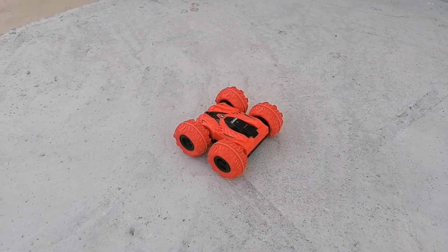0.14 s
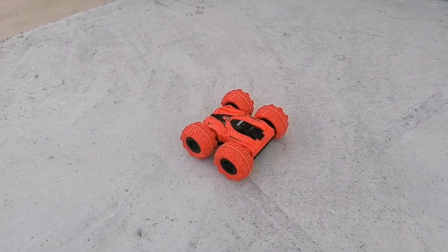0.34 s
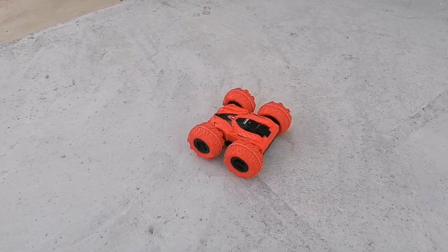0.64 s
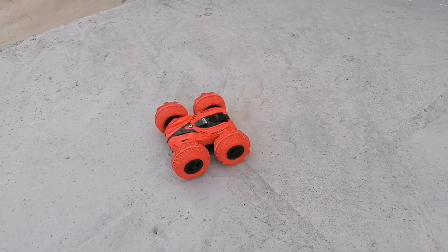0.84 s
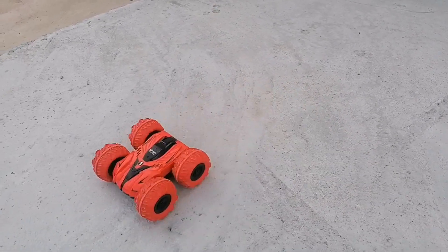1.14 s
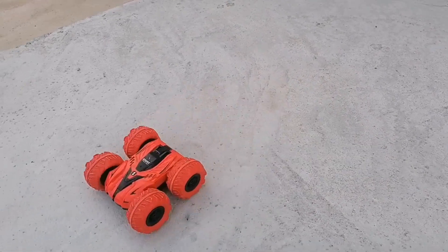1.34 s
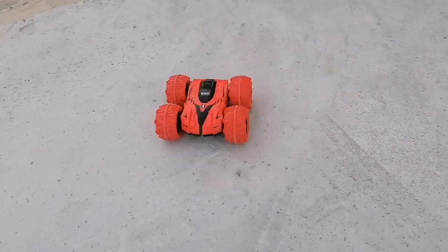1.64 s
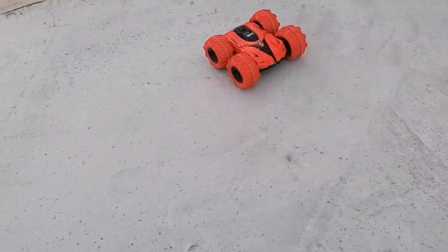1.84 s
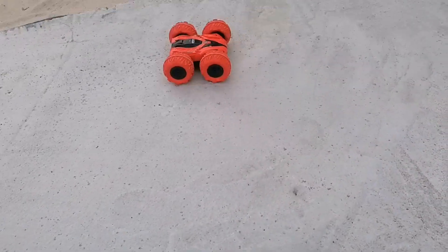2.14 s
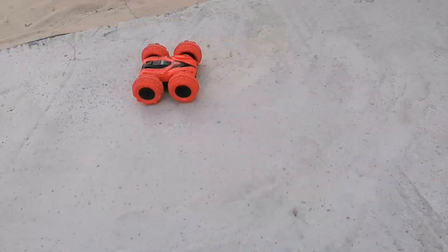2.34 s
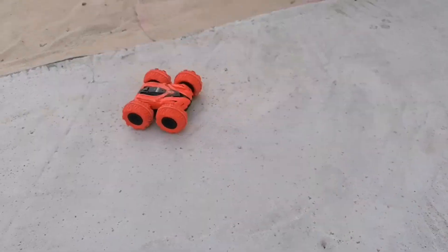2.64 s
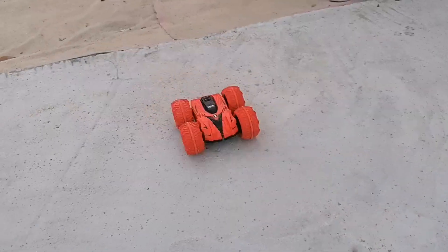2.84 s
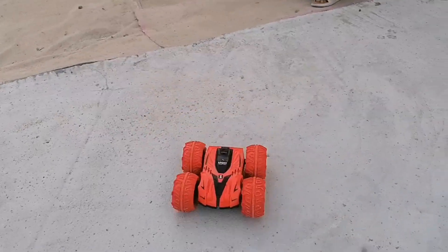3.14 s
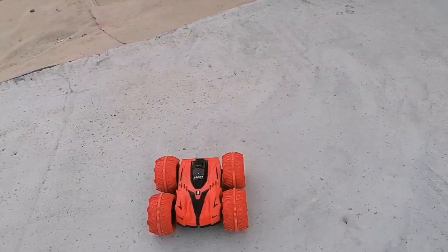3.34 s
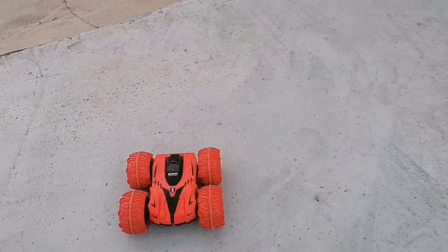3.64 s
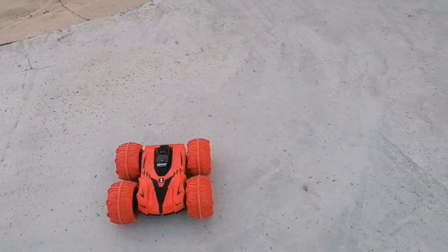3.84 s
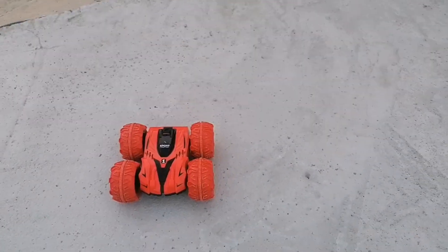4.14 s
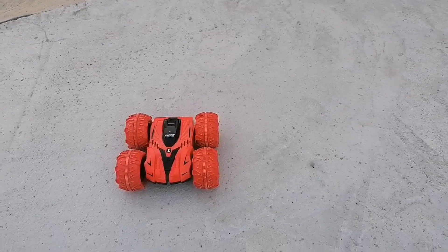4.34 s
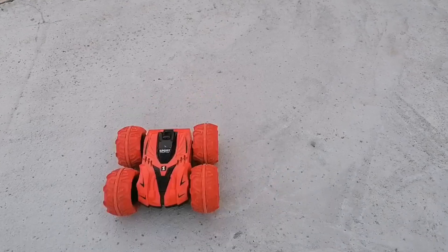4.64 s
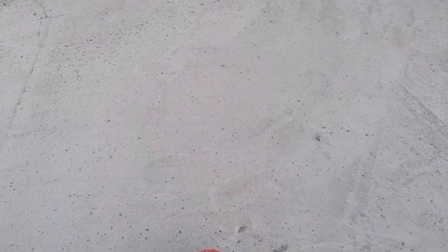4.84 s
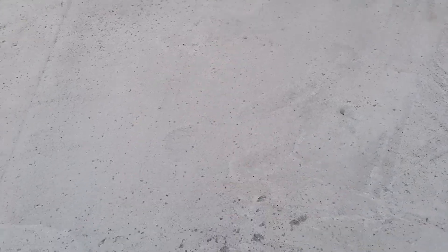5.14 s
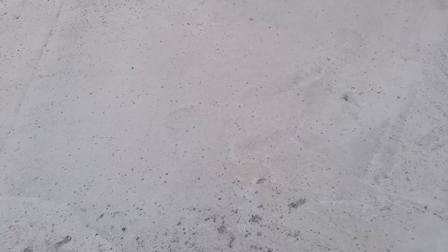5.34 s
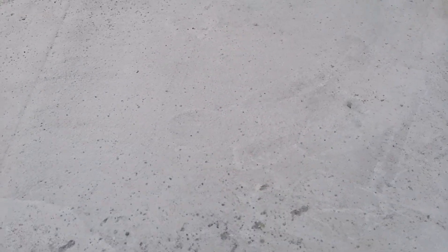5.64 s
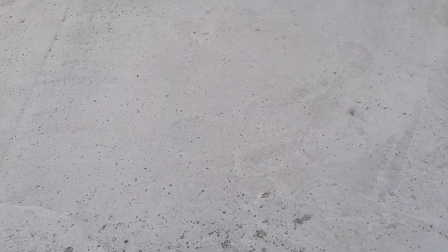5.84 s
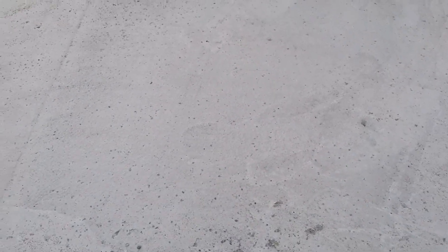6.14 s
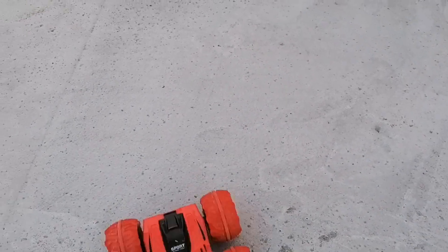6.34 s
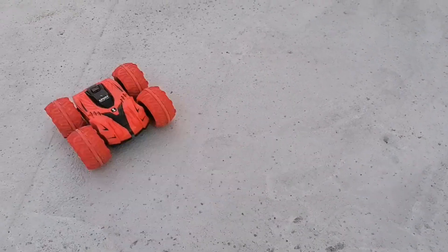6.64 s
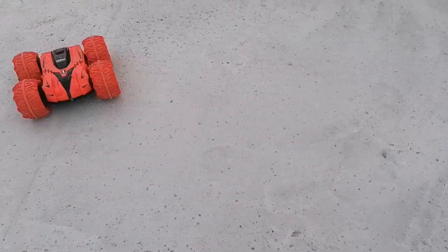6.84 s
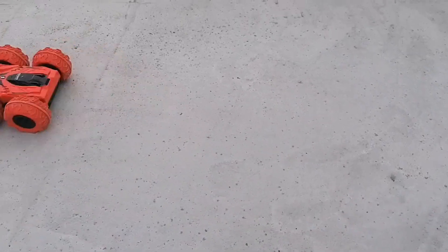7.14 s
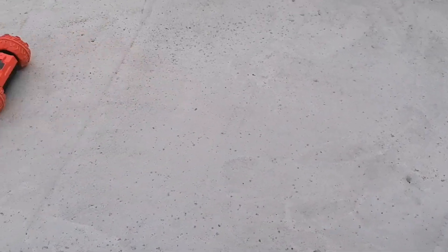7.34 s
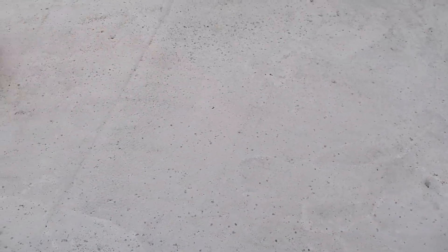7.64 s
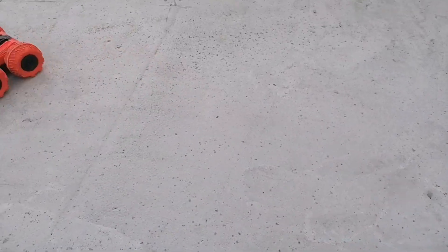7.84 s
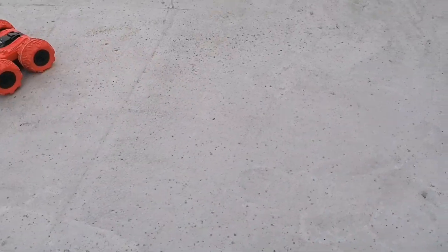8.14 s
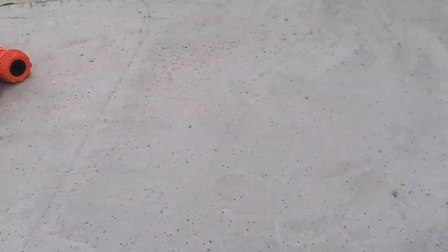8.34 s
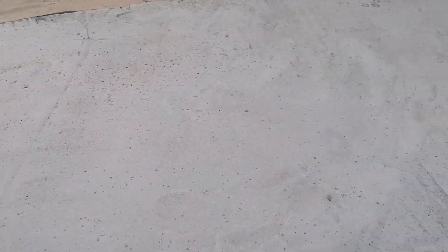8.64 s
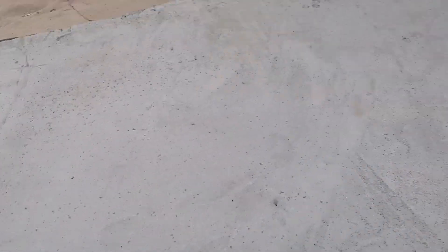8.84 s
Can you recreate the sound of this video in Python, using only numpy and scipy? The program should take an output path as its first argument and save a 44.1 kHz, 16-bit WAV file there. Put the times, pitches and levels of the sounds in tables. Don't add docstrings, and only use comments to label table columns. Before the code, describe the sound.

Close, buzzy plastic gear whirring starts, stops and races as a little remote-control car scuttles across concrete, knobbly wheels drumming and grit ticking.

```python
import sys
import numpy as np
from scipy import signal
from scipy.fft import rfft, irfft
from scipy.io import wavfile
from scipy.ndimage import uniform_filter1d, map_coordinates

SR = 44100
rng = np.random.default_rng(int(sys.argv[2]) if len(sys.argv) > 2 else 0)


def invert_db(level):
    return 10 ** (np.asarray(level, dtype=float) / 20)


def to_wav(sig):
    pcm = np.clip(np.atleast_2d(sig), -1, 1) * 32767
    pcm = np.round(pcm).astype(np.int16)
    wavfile.write(sys.argv[1], SR, pcm.T)


N = 9 * SR


def car():
    # frequency in Hz, level in dB.
    shell_tone = [(450, -68), (700, 5.5), (880, 11.5), (1100, 13.5), (1300, 13), (1500, -9), (1750, -1.5),
                  (2300, -94)]
    # frequency in Hz, level in dB.
    case_tone = [(1100, -75), (1450, 9), (1750, 10.5), (2100, 9.5), (2700, 7.5), (3300, -21), (3900, -8.5),
                 (5000, -64)]
    # frequency in Hz, level in dB per Hz.
    scrape_tone = [(1760, -21), (3000, 0), (4200, -2), (4800, -2), (5250, -4.5), (5800, -6), (7600, -9),
                   (8400, -10.5), (10500, -19), (12300, -33), (15000, -41)]
    # ring in Hz, width in Hz, level in dB.
    can = [(7370, 1170, 0)]
    # time in seconds, gear case turned to us in dB,
    # roughness of the ground in dB, underside turned to us in dB.
    turn_rows = [(0, 18, -10, 6), (.45, -2, 2, 5), (.75, 5, 2.5, 9.5), (1.02, 4.5, -11, 3), (1.4, 1, 5, 11),
                 (1.65, 5, -15, 3.5), (2.4, 4, -11, -17), (2.8, 3, -6, 11.5), (3.2, -3, -3, -0.5),
                 (3.55, -1, 3, 17), (3.95, -3.5, -7.5, -1.5), (4.3, -1, -0.5, 2), (5.8, -0.5, 2.5, 0.5),
                 (6.5, 1.5, -1, 4.5), (7.1, -2.5, -8, -3), (7.75, -5, 1, -2.5), (8.1, -0.5, -1, 1),
                 (8.25, -2.5, 4.5, -2), (8.52, 3.5, -9.5, 2), (8.64, 3, -12, -0.5), (8.8, 7, -17, -1),
                 (8.92, 3, -9, -6), (9, -1, -16, -3)]

    hz, effort_db, skid_db, *manner = throttle()
    case_db, ground_db, under_db = curves(turn_rows)
    whine, rattle = gears(hz, *manner)

    fizz_db = 3.5 + 0.12 * skid_db + under_db
    grit = .5 * clicks(9000, spread_db=3.0)
    scrape = coloured(invert_db(3.5) * whine + rattle + grit, scrape_tone)
    scrape = lifted(scrape, 11200, fizz_db)
    can_db = -18.5 - 0.56 * under_db
    scrape = scrape + invert_db(can_db) * steady(ring(scrape, can))

    drive = whine + rattle
    bright_db = 8.5 * np.log2(hz / 1000) + 0.71 * under_db
    case = steady(lifted(coloured(drive, case_tone), 2000, bright_db))

    wobble_db = 1.43 * chance(hz=21.2, channels=1)
    rock_db = 1.19 * chance(hz=6.9)
    strain_db = 0.32 * (skid_db - 5.5)
    body = invert_db(rock_db[0]) * coloured(drive, shell_tone)
    body = body + invert_db(case_db + strain_db + 0.3 * rock_db[1]) * case
    body = body + invert_db(skid_db) * scrape
    drum_db = ground_db + 1.31 * (effort_db + 21.5) - 22
    return invert_db(effort_db + wobble_db + 1.49) * body + tread(drum_db)


def throttle():
    # time in seconds, tooth meshing in Hz, effort in dB, skid in dB.
    NUDGE = [(.215, 888, -44.5, 1), (.262, 895, -32.5, 3), (.272, 922, -21.5, -10), (.3, 936, -23, -4),
             (.37, 920, -24, -4), (.43, 1158, -20, -5.5), (.52, 1220, -27.5, 3.5), (.62, 1200, -26.5, 0),
             (.7, 1247, -28, 0.5), (.75, 954, -28.5, -12)]
    CREEP = [(.76, 903, -30, -3), (.8, 1057, -32.5, -5), (.93, 863, -28.5, -10), (.98, 1084, -28.5, -3.5),
             (1.07, 1183, -29, -6.5), (1.1, 1057, -31, -1.5), (1.16, 1133, -29, -5), (1.24, 975, -33, -4.5),
             (1.37, 980, -35.5, -10)]
    TWITCH = [(1.38, 963, -32, -8), (1.48, 898, -27, -8), (1.51, 864, -34, -16.5)]
    DASH = [(1.53, 590, -32, -6), (1.56, 620, -23, -10.5), (1.65, 855, -21.5, -5.5), (1.7, 920, -20, -7.5),
            (1.725, 1040, -22, -4.5), (1.78, 1010, -23.5, -3), (1.85, 885, -23, -1), (1.97, 860, -23, -6)]
    EASE = [(2.0, 800, -24.5, -3.5), (2.1, 755, -27, -2), (2.13, 675, -24, -2.5), (2.2, 640, -25, -6),
            (2.25, 565, -25, -9), (2.3, 800, -28.5, -5.5), (2.38, 910, -31, -12), (2.495, 880, -38.5, 0.5)]
    RETURN = [(2.585, 600, -31.5, -12), (2.69, 1054, -25, -0.5), (2.85, 1236, -23.5, -2.5),
              (3.03, 1213, -21, 0), (3.11, 1320, -22, 0.5), (3.24, 1302, -18, -1), (3.3, 1098, -23, -6.5),
              (3.44, 1053, -17, -5.5), (3.6, 848, -25, -11.5)]
    CATCH = [(3.845, 755, -32, -42), (3.92, 797, -23.5, -13.5), (3.97, 832.5, -20.5, 2.5),
             (4.03, 882, -23, -8.5), (4.06, 906, -17, -6), (4.11, 888, -23.5, 2)]
    LONG_RUN = [(4.12, 869, -20, -1.5), (4.28, 935, -19, -5.5), (4.335, 1082, -17.5, -4.5),
                (4.4, 972, -20, -1.5), (4.47, 1063, -20.5, -2), (4.6, 909, -18, -4),
                (4.705, 1090, -19.5, -0.5), (4.76, 953, -21.5, -4), (4.83, 1069, -20, 2)]
    RUN_ON = [(4.84, 1047, -17.5, -4.5), (4.99, 1100, -20, -1.5), (5.08, 956, -19.5, -3),
              (5.19, 897, -16.5, -5), (5.3, 965, -19, -1.5), (5.44, 1065, -21, -2),
              (5.55, 941, -19.5, -0.5), (5.71, 1098, -17, -5), (5.855, 940, -19.5, -6.5)]
    COAST = [(5.89, 932, -29.5, -10), (5.97, 876, -30.5, -15.5), (6, 862, -35, -14),
             (6.27, 556, -42, -21.5)]
    SCUFF = [(6.3, 543, -46.5, 5.1), (6.35, 482, -55, 22.6), (6.4, 398, -47.5, 18)]
    LURCH = [(6.44, 422, -37, -7), (6.495, 632.5, -25, -8.5), (6.515, 940, -24, -1.5),
             (6.545, 644, -21.5, -9.5), (6.57, 960, -20.5, -0.5), (6.6, 1116, -17, -2),
             (6.625, 847, -24, -1.5), (6.73, 869, -28, -11.5)]
    WRIGGLE = [(6.75, 757, -21, -8), (6.79, 905, -18.5, -5.5), (6.82, 771.6, -24.5, -4),
               (6.86, 978, -14, -6.5), (6.868, 1247, -20.5, -9), (6.895, 1190, -17, -1),
               (6.91, 874, -15.5, -10), (6.94, 1046, -22, 3)]
    SPIN = [(6.955, 1160, -18, -0.5), (7.02, 1172, -20, -2.5), (7.06, 1187, -16, -2.5),
            (7.115, 1220, -19.5, -2), (7.16, 1263, -19, -1), (7.22, 1312, -19, -2.5), (7.3, 1367, -22, 0),
            (7.365, 1380, -20, 0.5)]
    GRIP = [(7.375, 1438, -20, 2), (7.41, 1400, -23, 6.5), (7.47, 1437, -22, 4), (7.55, 1260, -19.5, -2.5)]
    STUMBLE = [(7.56, 1271, -17.5, -3.5), (7.68, 1030, -18.5, -5), (7.795, 850, -19, -5)]
    SURGE = [(7.81, 901, -14.5, -5.5), (7.85, 1150, -20.5, 3.5), (7.91, 1200, -20.5, 5),
             (7.96, 1350, -24, 8.5), (8.0, 1310, -25.5, 7.5), (8.06, 1504, -22, 4), (8.095, 1311, -23.5, 0),
             (8.14, 1624, -20.5, 4.5), (8.185, 1000, -16, -10)]
    FADE = [(8.232, 915, -27, 0), (8.262, 917, -21, 3), (8.29, 900, -26, 9), (8.325, 890, -26, 8),
            (8.36, 860, -26, 0), (8.435, 912, -24, 6), (8.55, 876, -28, -7), (8.612, 860, -31, -5),
            (8.697, 836, -36, -8)]
    START = [(8.786, 497.3, -20.5, -10), (8.815, 524, -18.5, -6), (8.84, 560, -18, -3.5),
             (8.868, 826.5, -20, -1.5), (8.9, 863, -17.5, -3.5), (8.925, 960, -16, -2),
             (8.945, 1000, -18.5, 0), (8.965, 913, -16.5, -1.5), (9.0, 1098, -16.5, 0)]
    pushes = [(NUDGE, .6, .03, .1, .6), (CREEP, .6, .01, .05, .5), (TWITCH, .3, .02, 0, 1),
              (DASH, .6, .01, .1, .4), (EASE, .6, 0, .1, .3), (RETURN, .7, .03, .04, .8),
              (CATCH, .5, 0, .25, .6), (LONG_RUN, .54, .02, .2, .7), (RUN_ON, .52, .04, .22, 1),
              (COAST, .1, 0, 0, 1), (SCUFF, .1, 0, 0, 1), (LURCH, .65, 0, .3, .3),
              (WRIGGLE, .6, 0, .45, .3), (SPIN, .7, .11, .03, .2), (GRIP, .6, .01, .05, .4),
              (STUMBLE, .4, .03, 0, .7), (SURGE, .6, 0, .03, .3), (FADE, .25, .03, .5, 1),
              (START, .62, 0, .17, .25)]
    # time in seconds, length in seconds, change
    # of level in dB.
    lapses = [(0.41, 0.036, -3), (0.511, 0.058, 0), (1.9856, 0.022, -2.5), (3.288, 0.019, -1.5),
              (4.039, 0.033, -1), (4.63, 0.055, -1), (5.756, 0.051, -6), (6.75, 0.017, -3),
              (7.672, 0.021, -4.5), (5.439, 0.054, 1.5), (3.122, 0.027, 2.5), (8.3, 0.011, -5),
              (8.74, 0.059, -26), (8.345, 0.016, -2)]
    rise_db_per_s, fall_db_per_s, idle_db = 897, 521, -51.5
    slip_db = 18

    t = np.arange(N) / SR
    hz, skid_db = curves([(r[0], r[1], r[3]) for push in pushes for r in push[0]])
    levels, settings = [], []
    for rows, *rest in pushes:
        early = np.maximum(rows[0][0] - t, 0)
        late = np.maximum(t - rows[-1][0], 0)
        levels.append(curves(rows)[1] - rise_db_per_s * early - fall_db_per_s * late)
        settings.append((max(r[2] for r in rows), *rest))
    who = np.argmax(levels, 0)
    effort_db = np.maximum(np.max(levels, 0), idle_db)
    top_db, clear, *manner = uniform_filter1d(np.array(settings)[who].T, size=1500)
    clear = clear * np.clip(1.38 - (top_db - effort_db) / slip_db, .1, 1)
    lapse_db = sum(db * bump(s, length) for s, length, db in lapses)
    return hz, effort_db + lapse_db, skid_db, clear, *manner


def gears(hz, clear, sag, lead, loose):
    # multiple of the meshing speed, level in dB.
    teeth = [(1, -1.5), (2, 0), (3, -4.5), (4, -3), (5, -6), (6, -6), (7, -10), (8, -11)]
    # time in seconds, length in seconds,
    # gain of odd multiples in dB, gain of even multiples in dB.
    bites = [(0.304, 0.017, 10, 8), (0.34, 0.013, 6, 10), (0.662, 0.12, 6, 7), (1.01, 0.076, 1, 10),
             (1.561, 0.028, 7, 2), (2.606, .03, 2, 17.5), (2.649, 0.014, 10, 10), (3.1, 0.038, 1.5, 2),
             (3.492, 0.042, 7, -5), (4.439, 0.059, 5, 9), (7.249, 0.041, 1.5, 4), (7.348, 0.048, 5, -6),
             (1.666, 0.062, -6, 9), (1.777, 0.04, 9.5, -6), (1.831, 0.033, -16, -10),
             (1.921, 0.068, -1.5, 7), (2.046, 0.059, 0, 9), (2.171, 0.049, -4, 7), (2.25, 0.021, 15, 12),
             (2.699, 0.026, 5, 10), (2.848, 0.053, 10, 1), (2.999, 0.049, 3.5, 10.5), (3.205, 0.029, 6, -3),
             (7.223, 0.017, 7, 3), (7.309, .02, 8.5, 5), (4.073, 0.075, 12.5, 4), (4.349, 0.057, 6, 10),
             (4.551, 0.03, 0, 10), (4.762, 0.034, 7, 10), (5.249, 0.039, 4, -5), (5.601, 0.021, -3, 8),
             (5.667, 0.024, -1, 3), (6.518, 0.019, 5, 14), (6.589, 0.024, 2.5, 4), (6.79, 0.015, 5, 7),
             (6.837, .025, 0.5, 3), (6.886, 0.01, 4, 1), (6.967, 0.019, 8, 11.5), (7.066, 0.027, -1, -1),
             (7.17, 0.036, 6, 5.5), (7.45, 0.057, 2, 4), (7.6, 0.038, 8, -9), (7.879, 0.049, 9, -2),
             (7.996, 0.028, 9, 9), (8.094, 0.028, 5.5, 18.5), (8.176, 0.018, -2.5, -4),
             (8.828, 0.03, -13, 8.5), (8.865, 0.025, -6, 9.5), (8.89, 0.02, 11.5, 3),
             (8.918, .015, -3.5, 5), (8.947, .015, 7, -5), (8.967, .015, 4, 8), (8.99, 0.025, 8.5, -2)]
    wheel_hz, free_s = 11.4, 6.95

    odd_db = sum(odd * bump(s, length) for s, length, odd, _ in bites) * [[1], [0]]
    even_db = sum(even * bump(s, length) for s, length, _, even in bites) * [[1], [0]]
    wheel = (np.arange(N) / SR - free_s) * wheel_hz % 1
    saw = uniform_filter1d(1 - 2 * wheel, 500)
    flutter = loose * (.085 - .085 * clear) * chance(hz=22.0)
    jitter = .015 * chance(hz=80)
    apart = [[0], [1]] * (lead + .08 * loose * chance(hz=9))
    turns = np.cumsum(hz * (1 + apart + sag * saw + flutter + jitter), 1) / SR

    motors = 0
    for k, db in teeth:
        bite = invert_db(odd_db if k % 2 else even_db)
        contact = bite + .85 * chance(hz=47)
        motors = motors + invert_db(db) * contact * np.cos(2 * np.pi * k * turns)
    whine = motors + [[.5], [-.5]] * motors[::-1]
    rattle = 2.88 * np.sqrt(1 - clear) * clicks(5000, spread_db=1.0)
    return np.sqrt(clear) * evened(whine), rattle


def tread(db):
    taps = ring(clicks(260, spread_db=1.5), [(349, 205, -0.5), (542, 600, 6.5)])
    return invert_db(db - 7.5 + 1.42 * chance(hz=7.8, channels=1)) * steady(taps)


def thuds():
    # time in seconds, peak level in dB, ring in Hz.
    landings = [(0.437, -12.5, 753), (0.537, -12, 568), (0.608, -18, 454.8), (1.407, -22.5, 395.4),
                (2.986, -24, 349), (3.161, -15.5, 661), (3.231, -8.5, 672), (3.437, -8, 762),
                (3.607, -13, 416), (5.168, -11, 663.6), (5.562, -11.5, 676.5), (5.915, -21, 458),
                (6.453, -20.5, 453), (6.533, -15, 684), (6.939, -16.5, 304), (7.612, -13, 364),
                (7.695, -12.5, 289), (7.804, -14, 606), (7.923, -18, 551.7), (8.164, -21, 660.7)]
    return knocks(landings, t60=0.063, puff=1.0)


def clacks():
    # time in seconds, peak level in dB, ring in Hz.
    slams = [
        (1.999, -20, 1590),
        (2.739, -12, 2300),
        (2.747, -9, 2000),
        (3.6, -10, 1000),
        (5.7595, -14, 1750),
        (6.468, -18, 1000),
        (6.746, -14.5, 1800),
        (8.758, -37, 3500),
        (8.784, -13, 1200),
        (8.786, -15, 2430),
    ]
    return knocks(slams, t60=0.023, puff=1.35)


def grit_ticks():
    # time in seconds, peak level in dB, ring in Hz.
    snaps = [(2.001, -16, 1583), (2.738, 4.5, 2160), (3.6005, -3, 1000), (3.6635, -7, 3100),
             (3.669, -20, 3300), (3.682, -14, 3216), (3.6935, -17, 3120), (3.7, -11, 1000),
             (3.706, -18, 3440), (3.712, -19, 3300), (3.719, -23, 3860), (3.727, -21, 3710),
             (3.795, -27, 1110), (3.8117, -12.5, 2264), (3.85, -18, 953.3), (6.3041, -20, 3619),
             (6.468, -12, 946), (2.746, 0, 2500), (2.752, -9, 1500), (3.8417, -14, 1634), (5.762, 10, 1739),
             (5.9146, -23, 1720), (5.921, -10.5, 3630), (6.7496, -8, 1820), (7.2981, -19, 2835),
             (8.662, -18, 3600), (8.686, -21, 4460), (8.7, -16.5, 2000), (8.707, -16, 2330),
             (8.7144, -23, 5960), (8.7294, -22, 3280), (8.7598, -18, 3520), (8.785, 0, 1507),
             (8.788, -14, 4500)]
    return invert_db(-8.5) * knocks(snaps, t60=0.009, puff=0.8)


def knocks(rows, t60, puff):
    out, t = np.zeros(N), np.arange(2000) / SR
    for s, db, hz in rows:
        noise = rng.standard_normal(2000)
        sound = np.sin(2 * np.pi * hz * t) + puff * ring(noise, [(0.9 * hz, 1.5 * hz, 6.5)])
        level = invert_db(db - 60 * t / t60) * (1 - np.exp(-t * hz * 3))
        part = out[round(s * SR):][:2000]
        part += (level * sound)[:len(part)]
    return out


def traffic():
    # frequency in Hz, level in dB per Hz.
    air = [(12, -32), (20, 7), (64, 8), (347, -6.5), (571, -8.5), (841, -5.5), (1080, -4), (1420, -11),
           (1880, -9), (5230, -17), (7300, -20), (9360, -26.5), (15000, -37)]
    # frequency in Hz, width in Hz, level over the rumble in dB.
    engines = [(45.1, 17, -9), (78, 30, -17.5), (113.6, 13, -14), (188.2, 5.5, -20.5)]
    # time in seconds, level in dB.
    rumble = [(0, -17), (.7, -32.5), (2.2, -27), (2.7, -29.5), (5.1, -25.5), (6.2, -27.5), (7, -25.5),
              (8, -56), (8.75, -21), (9, -37)]
    # time in seconds, length in seconds, change in dB.
    lull = (8.742, .045, -8)

    wash = evened(irfft(rfft(rng.standard_normal((2, N))) * invert_db(read(air)), N))
    drones = 0
    for hz, width, db in engines:
        drones = drones + invert_db(db) * evened(ring(rng.standard_normal((2, N)), [(hz, width, 0)]))
    wash_db = -34 + 2.0 * chance(hz=1.0, channels=1) + lull[2] * bump(*lull[:2])
    return invert_db(wash_db) * wash + invert_db(curves(rumble)[0]) * drones


def evened(x):
    return x / np.sqrt(np.mean(x ** 2) + 1e-20)


def steady(x, size=6000):
    power = uniform_filter1d(uniform_filter1d((x ** 2).mean(0), size), size)
    return x / np.sqrt(abs(power) + 1e-20)


def curves(rows):
    s, *columns = np.transpose(rows)
    return [np.interp(np.arange(N) / SR, s, c) for c in columns]


def read(points):
    f, value = np.transpose(points)
    pitch = np.log(np.fft.rfftfreq(N, 1 / SR) + 1)
    return np.interp(pitch, np.log(f + 1), value, left=value[0], right=value[-1])


def chance(hz, channels=2):
    return evened(signal.lfilter(*signal.butter(2, hz, fs=SR), rng.standard_normal((channels, N))))


def clicks(per_s, spread_db):
    size_db = spread_db * np.minimum(rng.exponential(1, (2, N)), 5)
    size = invert_db(size_db) * rng.choice([-1, 1], (2, N))
    return evened(size * (rng.random((2, N)) < per_s / SR))


def bump(s, length):
    return np.exp(-((np.arange(N) / SR - s) / length) ** 2 * 2)


def ring(x, modes):
    out = 0
    for hz, width, db in modes:
        b, a = signal.iirpeak(hz, hz / width, SR)
        out = out + invert_db(db) * signal.lfilter(b, a, signal.lfilter(b, a, x))
    return out


def coloured(x, points):
    return steady(irfft(rfft(x) * invert_db(read(points)), N))


def lifted(x, hz, db):
    treble = signal.sosfiltfilt(signal.butter(2, hz, "high", fs=SR, output="sos"), x)
    return x + (invert_db(db) - 1) * treble


def scene():
    # frequency in Hz, likeness from 0 to 1.
    likeness = [(60, 0.95), (290, 0.88), (630, 0.84), (1380, 0.64), (3030, 0.27), (6640, 0.1),
                (14500, 0.11)]
    # time in seconds, lag of the left port in samples,
    # left minus right in dB.
    bearing = [(0, 7.5, 0), (.75, -1, 2), (1.25, 1.5, -1), (1.75, 2.5, 1), (2.25, 5, 1), (2.75, -0.5, 1),
               (3.25, 3.5, -0.5), (3.75, 7.5, 1.5), (4.2, -1, 0.3), (5.8, 0, -.5), (6.25, -8.5, 1.5),
               (6.75, -1.5, 0), (7.25, -11.5, 1.5), (7.75, -7, 3.5), (8.2, -5.5, 3.5), (8.7, 3, 0),
               (9, 0, 1)]

    a, b = rfft(car() + traffic())
    same = np.clip(read(likeness), 0, 1)
    shared = a * np.sqrt((1 + same) / 2)
    apart = b * np.sqrt((1 - same) / 2)
    pair = invert_db(-0.5) * irfft(np.array([shared + apart, shared - apart]), N)
    pair = pair + signal.lfilter(*signal.butter(2, 6500, fs=SR), thuds() + clacks())

    lag, pan_db = curves(bearing)
    half, n = lag / 2, np.arange(N)
    left = map_coordinates(pair[0], [n - half])
    right = map_coordinates(pair[1], [n + half])
    ticks = signal.lfilter(*signal.butter(2, 7500, fs=SR), grit_ticks())
    return (np.array([left, right]) + ticks) * invert_db([pan_db / 2, -pan_db / 2])


def gated(x):
    # frequency in Hz, power needed to pass as a multiple of its neighbours in frequency.
    gate = [(8000, 0), (9500, .5), (11500, 1.2)]
    hz, _, z = signal.stft(x, SR, "cosine", 2048)
    power = abs(z) ** 2
    need = np.interp(hz, *np.transpose(gate))[:, None] * uniform_filter1d(power, size=40, axis=1)
    return signal.istft(z * (power >= need), SR, "cosine", 2048)[1][:, :N]


def top_cut(x):
    return signal.sosfilt(signal.butter(12, 15140, fs=SR, output="sos"), x)


def record(dry):
    # frequency in Hz, left over right in dB.
    port_balance = [(40, 1), (500, 0), (3200, -1), (4500, 2.6), (9000, 2.2), (13000, -3.5)]
    # frequency in Hz, lead of the left port in radians.
    twist = [(600, 0), (2700, -1), (3700, 0), (15000, 0)]
    half = invert_db(read(port_balance) / 2) * np.exp(.5j * read(twist))
    ports = irfft(rfft(dry) * [half, 1 / half], N)
    over = np.maximum(abs(ports) - .55, 0)
    soft = ports - np.sign(ports) * (over - .5 * np.tanh(over / .5))
    return top_cut(np.clip(gated(soft), -1, 1))


dry = scene()
out = record(dry)
to_wav(out)
```